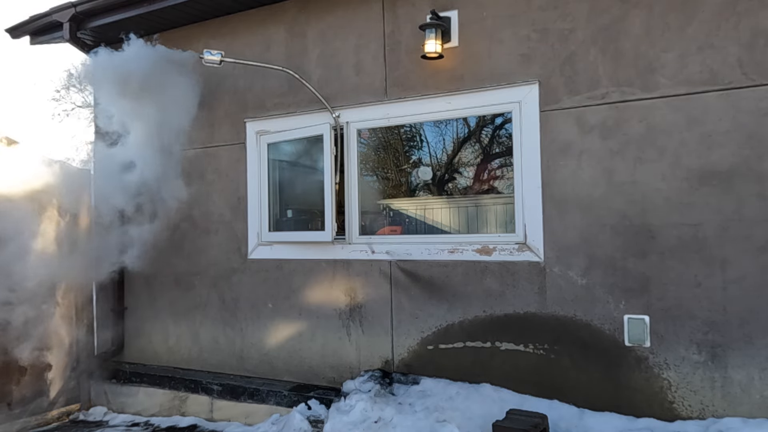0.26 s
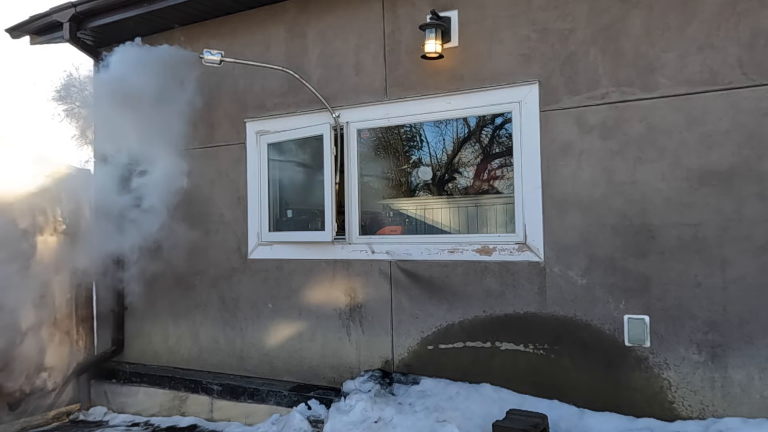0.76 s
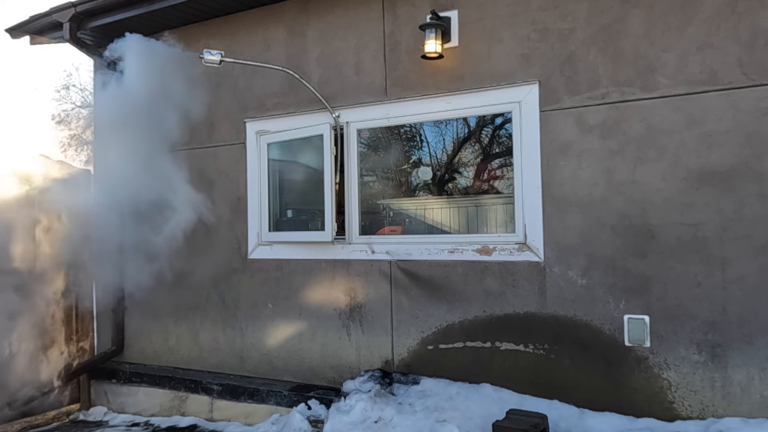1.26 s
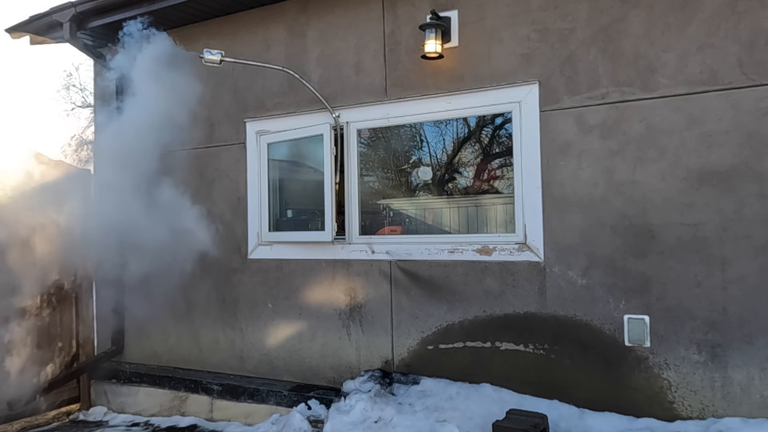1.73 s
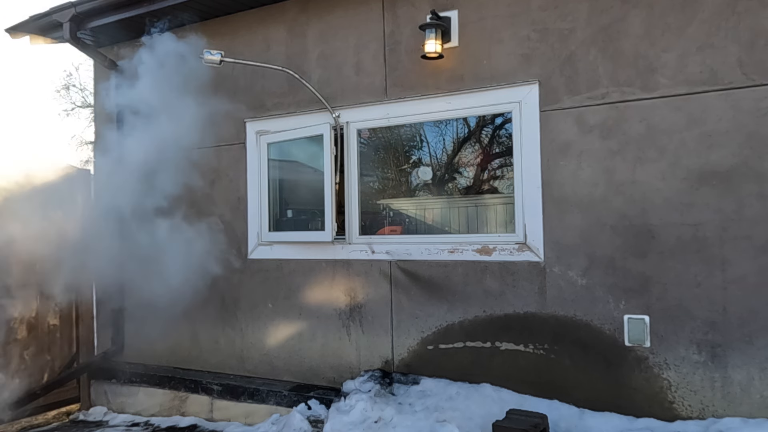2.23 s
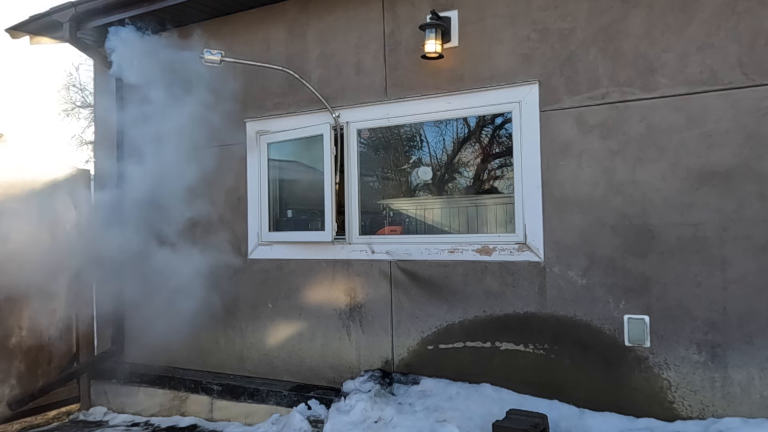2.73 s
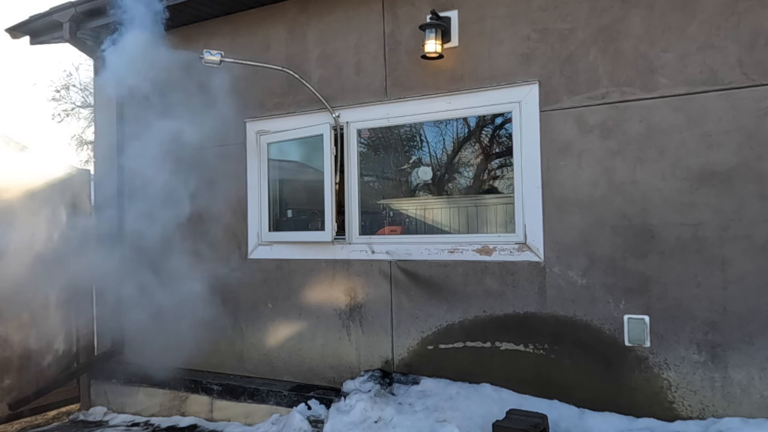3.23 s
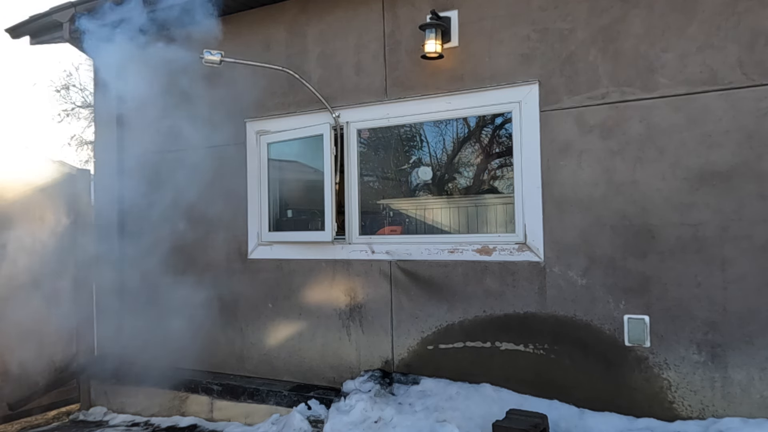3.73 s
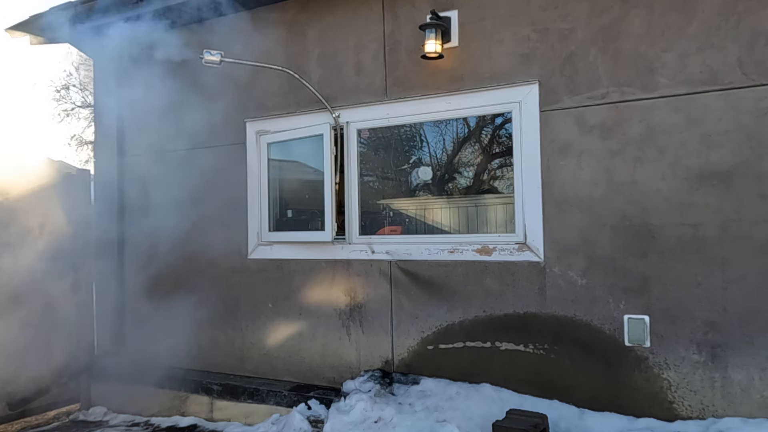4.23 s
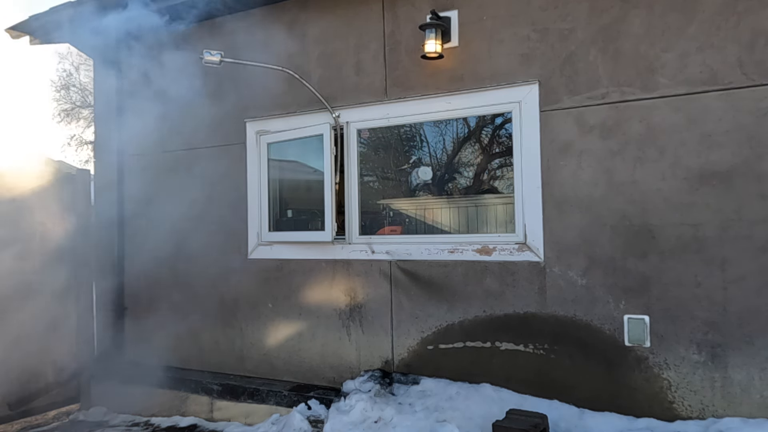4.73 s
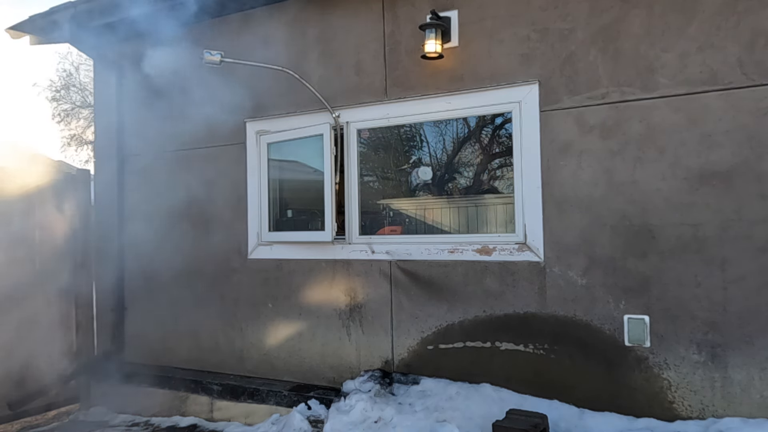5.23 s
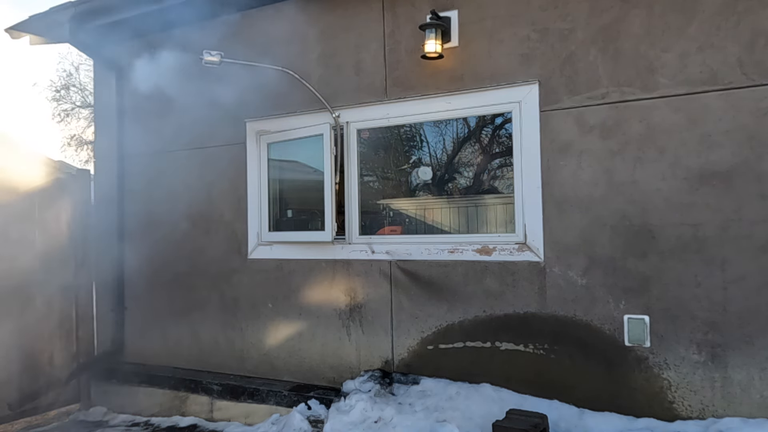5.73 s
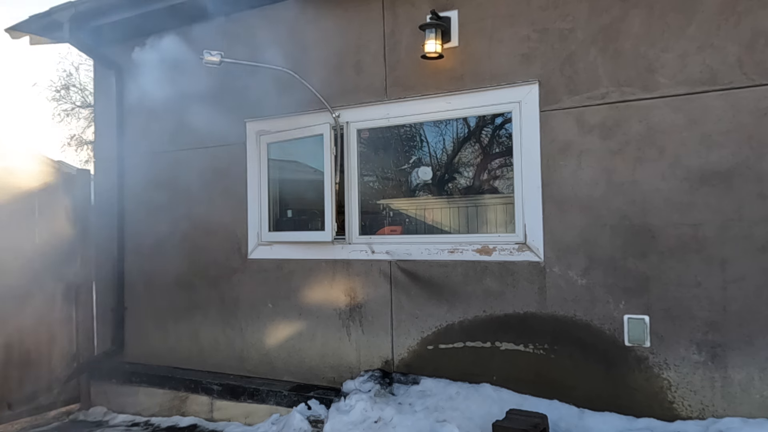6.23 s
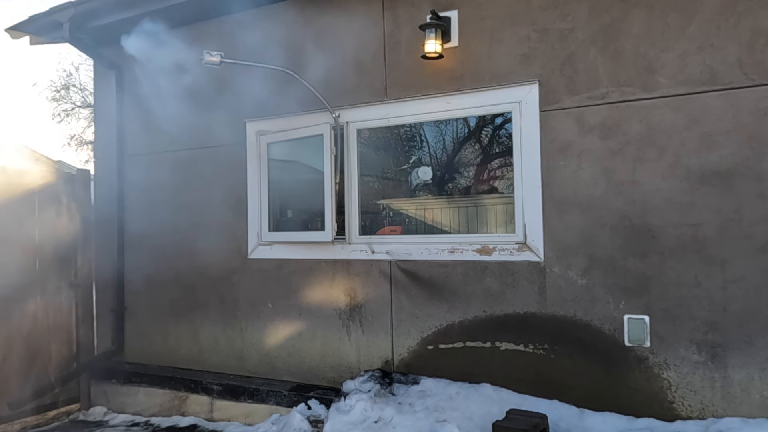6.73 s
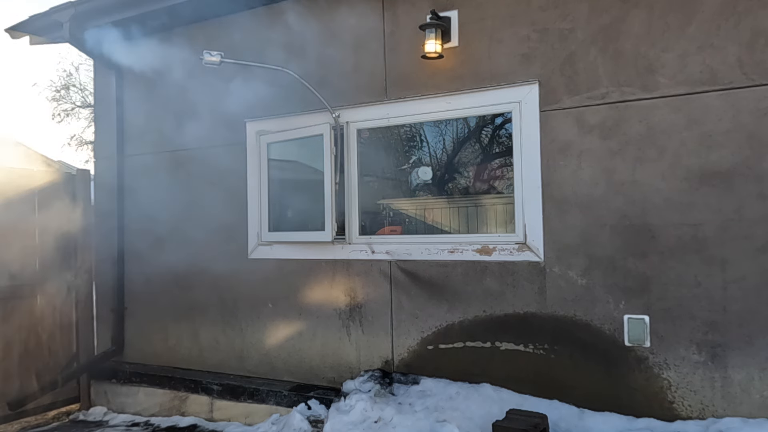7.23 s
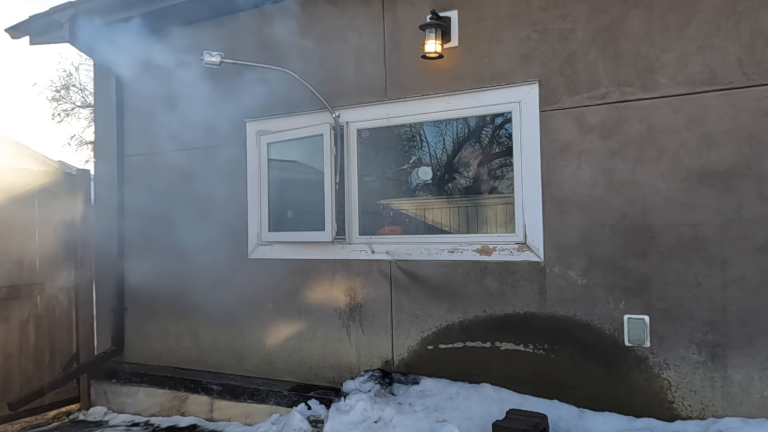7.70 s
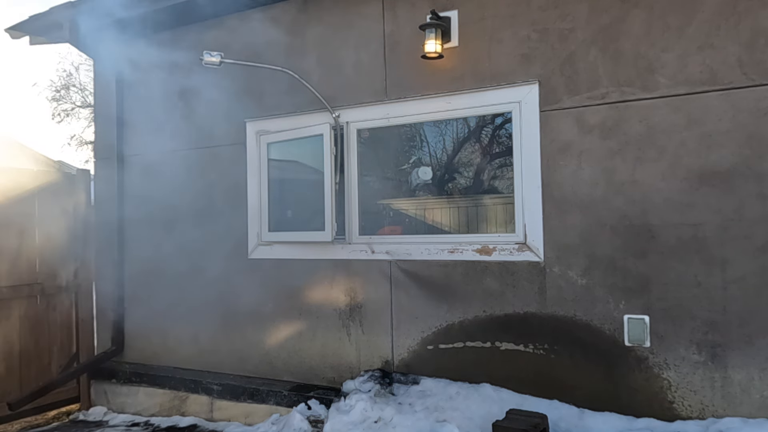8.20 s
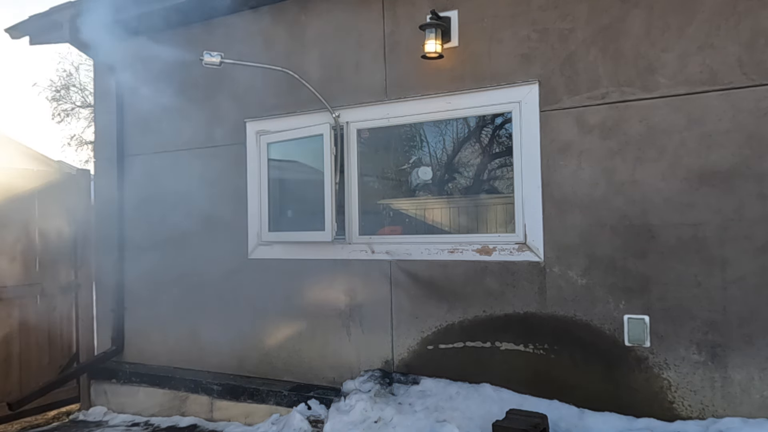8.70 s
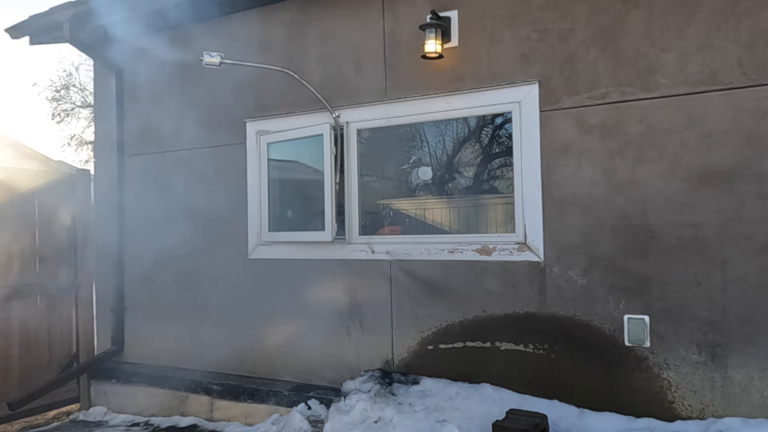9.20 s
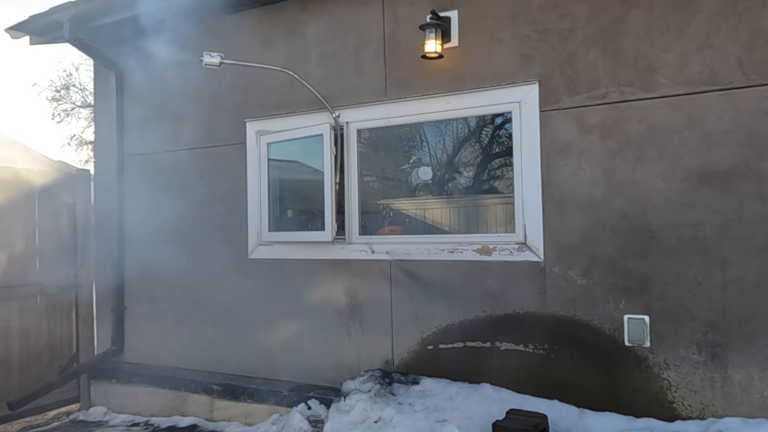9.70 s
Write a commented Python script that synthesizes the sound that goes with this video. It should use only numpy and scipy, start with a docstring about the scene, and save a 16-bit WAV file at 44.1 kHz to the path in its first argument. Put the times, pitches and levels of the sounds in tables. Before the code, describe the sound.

A small diesel heater's low, fluttering roar and drone pulse unevenly from an exhaust pipe, with airy blower hiss, wind bumps, icy ticks and distant chirps.

```python
"""A low, unsteady roar with a drone under it: a small diesel heater burns and vents through a pipe in a
house wall, out in the snow. Noise filled with the resonances of chamber and pipe makes the roar, which
flares with each dose of fuel; a wavering sine drones. The blower is hissing noise, a blade tone and duct
whistles. Gusts of low noise bump the microphone, short noise bursts tick like ice close by, and a distant
bird, gliding sines with a diffuse echo, chirps three times."""
import sys
import numpy as np
from scipy import signal
from scipy.fft import rfft, irfft
from scipy.io import wavfile
from scipy.ndimage import uniform_filter1d

SR = 44100
rng = np.random.default_rng(int(sys.argv[2]) if len(sys.argv) > 2 else 0)


def materialize(psi):
    """Save the field psi as 16-bit PCM at rate SR to the path in sys.argv[1].

    A 1-D psi becomes a single channel; in a 2-D psi each row is a channel.
    """
    bounded = np.clip(np.atleast_2d(psi).T, -1, 1)
    quanta = np.round(bounded * 32767).astype(np.int16)
    wavfile.write(sys.argv[1], SR, quanta)


N = 438794
T = np.arange(N) / SR  # time [s]
HZ = np.maximum(np.arange(N // 2 + 1) * SR / N, 1)  # frequency of each spectral bin [Hz], kept above zero

# small icy ticks: (time [s], level before the common gain [dB], centre [Hz], width [Hz], left minus right [dB])
TICK_EVENTS = [(0.136, -69, 10500, 7000, -1), (0.152, -69, 10500, 7000, 0), (0.185, -67, 9000, 7000, 0),
               (0.24, -70, 11000, 6000, 0), (0.284, -60, 4500, 4500, 0), (0.665, -55.5, 7200, 6500, -5),
               (0.677, -60, 9500, 14000, 3), (0.686, -67, 12000, 3000, 1), (0.713, -68, 8500, 8000, 1),
               (0.7556, -49.5, 5000, 4600, -1), (0.757, -54, 5800, 6500, -1), (1.38, -66, 9500, 7000, 0),
               (1.413, -51, 3380, 1300, 0), (2.694, -58, 4200, 2200, -3), (2.724, -54, 3120, 1500, -3),
               (3.078, -58.5, 5500, 3400, 0), (3.409, -56.5, 5900, 6000, -1),
               (3.4266, -60, 8500, 11000, -1), (3.511, -58, 5500, 2000, -4), (4.15, -60, 5000, 4000, -12),
               (4.195, -54, 4300, 2600, -2), (4.569, -56, 8500, 18000, 2), (4.576, -66, 7500, 7000, 11),
               (4.581, -63, 11000, 7000, 7), (4.622, -64, 8500, 11000, 0), (5.216, -63, 8500, 9000, -1),
               (5.32, -53, 3280, 2000, -3), (5.815, -65, 7500, 7000, 0), (5.86, -58, 6300, 4500, -1),
               (6.243, -61, 8700, 11000, 3), (6.431, -59, 7180, 5000, 0), (6.51, -57, 6800, 4000, 0),
               (6.947, -65, 8450, 9000, 1), (7.158, -54, 6000, 6000, 0), (7.504, -56.5, 7200, 12000, 1),
               (7.553, -65, 9580, 10000, 0), (7.81, -55, 5420, 4800, 0), (8.066, -58, 5830, 5030, -2),
               (8.162, -55, 6000, 5000, -1), (8.179, -65, 8000, 9000, 0), (8.187, -61, 9800, 8000, 1),
               (8.46, -61, 6260, 6000, 1), (8.627, -53.5, 6340, 6550, 0), (8.898, -67, 9000, 8000, 2),
               (9.113, -56.5, 7800, 10000, 0), (9.186, -53, 8600, 12900, 0), (9.189, -55, 8600, 12900, 0),
               (9.202, -67, 9800, 7000, 4), (9.293, -56, 8000, 7500, 2), (9.305, -61, 7270, 7000, 3),
               (9.37, -72, 11000, 5000, 3), (9.737, -68, 7500, 8000, 12), (9.76, -59, 7140, 10100, -2),
               (9.832, -66, 9100, 8400, -3)]


def flame():
    """Forced resonance: combustion noise excites chamber and pipe, and one low mode sustains itself."""
    # slow course of the flame: (time [s], roar [dB], low body of the roar [dB], rumble [dB], drone [dB])
    burning = [(0.0, -43.5, -47, -38.5, -36.5), (0.9, -43.5, -47.5, -39, -37),
               (2.1, -42, -47.5, -38, -37.5), (3.4, -43, -49, -38.5, -38), (3.87, -43, -50, -38, -43.5),
               (4.35, -45.5, -50.5, -39, -36.5), (5.3, -47.5, -53, -43, -43.5), (5.8, -45, -51, -41, -39),
               (6.3, -47.5, -51, -40, -40), (6.9, -48.5, -55.5, -40, -42), (7.35, -49.5, -55, -40.5, -42),
               (7.9, -49.5, -55.5, -41.5, -44.5), (8.9, -50, -55, -39.5, -42), (9.95, -52, -54, -41, -43.5)]
    # exhaust pipe resonances: (frequency [Hz], width [Hz], relative level [dB])
    pipe_modes = [(407.7, 32.5, 1), (469.7, 55, -5), (508.7, 25, -3.5), (559.2, 15, -7.5), (592, 47, -11.5),
                  (667.8, 12.6, -8), (697, 27, -11), (850, 146, -18.5), (958, 55, -12.5), (1051, 75, -12.5),
                  (1202, 23, -18.5), (1250, 45, -14), (1331, 28, -21)]
    # lowest exhaust resonances, the body of the roar: (frequency [Hz], width [Hz], relative level [dB])
    body_modes = [(269.6, 51, 0), (319, 49, -1), (345.5, 32, 2.5)]
    # burner chamber resonances: (frequency [Hz], width [Hz], relative level [dB])
    chamber_modes = [(55.8, 16, -5), (71.5, 10.2, -0.5), (94, 22, -11.5)]
    # chamber overtones, which throb with the doses: (frequency [Hz], width [Hz], relative level [dB])
    throb_modes = [(160, 88, -2), (215, 41.4, 0.5)]
    flare_db, flare_per_sunk_db = 0.9, 0.0928  # per unit of flare; added to it for each dB the roar has sunk
    flicker_db, drone_flare_db = 0.96, 0.26  # random flicker, rms; further swing of the drone per unit of flare
    rumble_follow, throb_follow, throb_db = 0.67, 0.98, -8.5  # shares of the surge; throb relative to rumble
    drone_hz, waver_hz, flutter = 119.6, 2.53, 0.37  # waver and flutter are rms

    roar_db, body_db, rumble_db, drone_db = curves(burning)
    sunk_db = roar_db.max() - roar_db
    flaring = flare()
    # the lower the flame burns, the more each dose of fuel shows
    surge_db = flaring * (flare_db + flare_per_sunk_db * sunk_db) + flicker_db * walk(9.5)

    pipe = wander(outdoors(resonances(pipe_modes)), share=0.005005)
    roar = steadied(pipe, seconds=0.44) * undb(roar_db + surge_db)
    body = steadied(outdoors(resonances(body_modes)), seconds=0.44) * undb(body_db + surge_db)

    chamber = steadied(outdoors(resonances(chamber_modes)), seconds=0.59)
    rumble = chamber * undb(rumble_db + rumble_follow * surge_db)
    overtones = steadied(outdoors(resonances(throb_modes)), seconds=0.29)
    throb = overtones * undb(rumble_db + throb_db + throb_follow * surge_db)

    phase = 2 * np.pi * np.cumsum(drone_hz + waver_hz * walk(12.5)) / SR
    singing = steadied(np.sin(phase) * (1 + flutter * walk(11.8)), seconds=0.49)
    drone = singing * undb(drone_db + surge_db + drone_flare_db * flaring)
    return roar + body + rumble + throb + drone


def flare():
    """Pulsed heat release: each dose lifts the flame quickly, holds and lets it sink to the rest value -1."""
    # doses of fuel: (time [s], strength [1 lifts the flare from -1 to 1])
    fuel_doses = [(0.0, 0.4), (0.72, 0.59), (1.52, 0.53), (2.42, 0.29), (3.12, 0.93), (3.98, 0.6),
                  (4.72, 1.37), (5.5, 0.98), (6.27, 0.85), (7.08, 1.3), (7.9, 0.75), (8.68, 0.93),
                  (9.48, 1.1)]
    rise_s, hold_s, fall_s = 0.11, 0.22, 0.27
    corners_s = np.cumsum([0, rise_s, hold_s, fall_s])
    heat = sum(strength * np.interp(T - s, corners_s, [0, 1, 1, 0]) for s, strength in fuel_doses)
    return 2 * heat - 1


def wander(x, share, rate=3.04):
    """Sound speed rises with temperature: hot and cool puffs of gas pull the resonances up and down."""
    warped = T + np.cumsum(share * walk(rate)) / SR  # share: rms change of pitch
    return np.array([np.interp(warped, T, ear, period=N / SR) for ear in x])


def blower():
    """Flow noise and blade passing: air hisses through the resonant duct, the blades give one thin tone."""
    # blade passing: (time [s], frequency [Hz], level before the common trim [dB])
    blade_tone = [(0, 1543, -61), (0.8, 1555, -60), (3.5, 1559, -59.5), (4.7, 1565, -60), (6.0, 1573, -62),
                  (7.5, 1564, -58), (8.8, 1548, -59.5), (9.95, 1556, -61)]
    # rush of the air: (frequency [Hz], relative level per Hz [dB])
    air_colour = [(150, -12.5), (400, -5), (650, 5.5), (850, -0.5), (1150, 3.5), (1500, -1), (1850, -7.5),
                  (2150, -4.5), (2700, -7.5), (3000, -11), (3400, -11), (4000, -17.5), (5200, -20),
                  (6200, -24.5), (7700, -24.5), (8400, -30.5), (12000, -33), (13100, -43), (14000, -53)]
    # duct resonances in that rush: (frequency [Hz], width [Hz], relative level [dB])
    duct_modes = [(1676, 34, 2), (2073, 18, -4), (2274, 10, 3), (2378, 34, 3.5), (2520, 70, -1),
                  (2855, 41, 1.5), (3335, 140, -7), (3795, 70, -11.5), (4690, 220, -11), (5670, 120, -15),
                  (7210, 390, -13.5)]
    air_db, duct_db, tone_trim_db = -52.0, -65.5, -2.5
    waver_hz, flutter = 2.04, 0.056  # rms

    air = outdoors(colour(air_colour) * walls(0.12)) * undb(air_db + 0.5 * walk(12))
    duct = outdoors(resonances(duct_modes)) * undb(duct_db + 0.42 * walk(13.0))
    hz, tone_db = curves(blade_tone)
    phase = 2 * np.pi * np.cumsum(hz + waver_hz * walk(13.2)) / SR
    tone = unit(np.sin(phase) * (1 + flutter * walk(27))) * undb(tone_db + tone_trim_db)
    return air + duct + tone * pan(db=5.0)


def walls(strength, count=6):
    """Comb filtering: early echoes off wall, eaves and fence ripple the colour of a steady sound."""
    lags_s = rng.uniform(0.003, 0.025, count)
    return np.abs(1 + strength * sum(np.exp(-2j * np.pi * HZ * lag) for lag in lags_s))


def whistles():
    """Edge tones: air over the duct's edges whistles faintly, the lower one swelling, the upper one wavering."""
    # upper whistle: (time [s], frequency [Hz], level [dB])
    upper_course = [(0, 4710, -86), (2.6, 4710, -85), (5.0, 4710, -84), (5.7, 4700, -83), (5.92, 4690, -73),
                    (6.2, 4720, -83), (6.45, 4780, -87), (6.8, 4970, -80), (8.8, 4970, -81),
                    (9.95, 4940, -86)]
    # swells of the lower whistle: (time of the peak [s], rise [s], fall [s], level [dB])
    lower_swells = [(0.23, 0.15, 0.1, -64.5), (0.6, 0.15, 0.12, -66), (2.42, 0.048, 0.048, -61),
                    (3.7, 0.06, 0.06, -64)]
    low_hz, low_width_hz, low_floor_db = 2825, 45, -75
    waver_hz, waver_db = 45, 2.0  # rms
    breath_hz = 110  # spread of the breathy upper whistle to either side of its centre

    low = outdoors(resonances([(low_hz, low_width_hz, 0)])) * swells(lower_swells, floor_db=low_floor_db)
    high_hz, high_db = curves(upper_course)
    phase = 2 * np.pi * np.cumsum(high_hz + waver_hz * walk(4)) / SR
    breathy = walk(breath_hz) * np.sin(phase) + walk(breath_hz) * np.cos(phase)  # a narrow band of noise
    return low + breathy * undb(high_db + waver_db * walk(6))


def wind():
    """Turbulent pressure: gusts bump both microphone ports together, the right one harder."""
    # turbulence: (frequency [Hz], relative level per Hz [dB])
    wind_colour = [(6, -28), (18, 7.5), (40, -1.5), (65, 0.5), (100, -12.5), (200, -26.5), (500, -50),
                   (1500, -101)]
    # gusts: (time of the peak [s], rise [s], fall [s], level [dB])
    gust_swells = [(0.64, 0.022, 0.028, -22), (0.963, 0.16, 0.06, -25), (2.45, 1, 0.5, -39),
                   (4.18, 0.22, 0.12, -29), (8.889, 0.0072, 0.042, -25), (9.103, 0.018, 0.05, -28.5),
                   (9.42, 0.08, 0.15, -30.5)]
    breeze_db, apart_db = -50, -20.0  # light air between gusts; each port's own turbulence, relative

    eddies = colour(wind_colour)
    shared = steadied(noise(eddies), seconds=0.12) * pan(db=-5.0)
    separate = np.array([noise(eddies), noise(eddies)])
    return (shared + undb(apart_db) * separate) * swells(gust_swells, floor_db=breeze_db)


def ticks():
    """Impulsive fracture: each tick is a brief crack of coloured noise with a faint, crumbling tail."""
    # ring that all ticks share: (frequency [Hz], relative level [dB])
    shared_ring = [(1500, -12), (2800, 6), (4600, -1.5), (5250, 2.5), (6100, -2), (7100, 2), (8500, -6.5),
                   (10500, -3.5), (12300, -1.5), (13200, -6), (14200, -14)]
    rise_s, decay_s, tail_s = 0.0012, 0.0013, 0.037
    tail_db, crumble_db, gain_db = -27, 4, 12.5  # tail relative to crack; its random variation; common gain
    apart = 0.33  # share of the sound that differs between the ears

    out = np.zeros((2, N))
    age = T[:SR // 10]
    hz = np.maximum(np.fft.rfftfreq(len(age), 1 / SR), 1)
    ring = np.interp(hz, HZ, colour(shared_ring))
    for s, db, centre_hz, width_hz, pan_db in TICK_EVENTS:
        shape = ring / (1 + ((hz ** 2 - centre_hz ** 2) / (hz * width_hz)) ** 2)  # one broad resonance
        white = rng.standard_normal((2, len(age)))
        mid, side = unit(irfft(shape * rfft(white), len(age)))
        ears = np.array([mid + apart * side, mid - apart * side])

        knots = np.linspace(0, age[-1], num=30)
        crumbling_db = crumble_db * np.interp(age, knots, rng.standard_normal(size=30))
        tail = undb(tail_db + crumbling_db) * np.exp(-age / tail_s)
        strength = (1 - np.exp(-age / rise_s)) * (np.exp(-age / decay_s) + tail)

        start = int(s * SR)
        out[:, start:start + len(age)] += ears * strength * undb(db + gain_db) * pan(pan_db)
    return out


def crumbs(count=40, size_db=-70, decay_s=0.003, scatter_s=0.12):
    """Clustered random impulses: tinier ticks scatter around the larger ones, stronger on the left."""
    strength = np.zeros(N)
    age = T[:SR // 30]
    for pick, lag, size in rng.random((count, 3)):
        parent_s = TICK_EVENTS[int(pick * len(TICK_EVENTS))][0]
        s = parent_s + scatter_s * np.log(lag / (1 - lag))  # logistic scatter, before or after
        start = int(s * SR) % (N - len(age))
        strength[start:start + len(age)] += undb(size_db) * (0.5 + size) * np.exp(-age / decay_s)
    grit = outdoors(colour([(2000, -10), (5000, 4), (12000, -4), (14000, -24)]))
    return strength * grit * pan(db=3)


def bird():
    """Frequency glides and reverberation: whistles drop and level off, and the yards between echo them."""
    # notes, three to a call: (time [s], length [s], end pitch [Hz], fall [share of end pitch], peak level [dB])
    bird_notes = [(1.316, 0.03, 3330, 0.1, -57), (1.381, 0.073, 3130, 0.14, -55),
                  (1.51, 0.04, 2580, 0.061, -57.5), (4.743, 0.02, 3260, 0.07, -59),
                  (4.78, 0.088, 3060, 0.27, -57.5), (4.882, 0.026, 2600, 0.05, -54),
                  (7.244, 0.026, 3240, 0.1, -60), (7.352, 0.04, 2920, 0.17, -58),
                  (7.405, 0.045, 2760, 0.025, -61)]
    bend, warble, rough = 1.72, 0.0043, 0.26  # curve of the fall; rms shares of pitch and of amplitude
    echo_db, echo_lag_s, echo_decay_s = -1.5, 0.016, 0.06  # echo relative to the direct song

    song, quiver, rasp = np.zeros(N), walk(121), walk(150)
    for s, length, end_hz, fall, db in bird_notes:
        u = np.linspace(0, 1, int(length * SR))
        note = slice(int(s * SR), int(s * SR) + len(u))
        hz = end_hz * (1 + fall * (1 - u) ** bend) * (1 + warble * quiver[note])
        strength = undb(db) * np.sqrt(np.abs(np.sin(np.pi * u))) * (1 + rough * rasp[note])
        song[note] += strength * np.sin(2 * np.pi * np.cumsum(hz) / SR)

    age = T[:SR // 2] - echo_lag_s
    decay = (age > 0) * np.exp(-age / echo_decay_s) / np.sqrt(echo_decay_s * SR / 2)  # energy about 1
    yards = rng.standard_normal((2, len(age))) * decay
    echo = signal.fftconvolve(song[None], yards, axes=1)[:, :N]
    return song + undb(echo_db) * echo


def undb(db):
    """Logarithmic level: decibels to amplitude gain."""
    return 10 ** (np.asarray(db) / 20)


def unit(x):
    """Effective value: scale to rms 1."""
    return x / np.sqrt(np.mean(x ** 2))


def curves(table):
    """Linear interpolation: each column of a time table, sample by sample."""
    s, *columns = np.transpose(table)
    return [np.interp(T, s, c) for c in columns]


def colour(points):
    """Spectral envelope: gain per frequency from (frequency [Hz], level [dB]) points, over log frequency."""
    hz, db = np.transpose(points)
    return undb(np.interp(np.log(HZ), np.log(hz), db))


def resonances(modes):
    """Modal superposition: gain per frequency of steep-sided resonances that add in power."""
    power = 0
    for hz, width, db in modes:
        detuning = (HZ ** 2 - hz ** 2) / (HZ * width)
        power = power + (undb(db) / (1 + detuning ** 2)) ** 2
    return np.sqrt(power)


def noise(gain):
    """Filtered Gaussian noise: turbulence with the given colour, rms 1."""
    spectrum = rng.standard_normal(len(HZ)) + 1j * rng.standard_normal(len(HZ))
    return unit(irfft(gain * spectrum, N))


def walk(rate):
    """Low-pass noise: smooth chance that changes about rate times a second, rms 1."""
    return noise(np.exp(-(HZ / rate) ** 2))


def outdoors(gain):
    """Partial coherence: turbulence heard directly and, scattered by wall and fence, differently in each ear."""
    # sound that differs between the ears: (frequency [Hz], side minus mid [dB])
    side_colour = [(60, -50), (120, -19), (350, -16.5), (700, -12.5), (1400, -9.5), (3000, -9),
                   (6000, -9.5), (10000, -9.5), (13000, -1)]
    scattered = gain * colour(side_colour)
    side = noise(scattered) * np.sqrt(np.sum(scattered ** 2) / np.sum(gain ** 2))
    return noise(gain) + np.array([[1], [-1]]) * side


def pan(db):
    """Interaural level difference: left and right gains for left minus right in dB."""
    return undb(np.array([[db], [-db]]) / 2)


def steadied(x, seconds):
    """Running rms normalisation: turbulence without its slow swells, so that a control sets its strength."""
    power = np.mean(np.atleast_2d(x) ** 2, axis=0)
    return x / np.sqrt(uniform_filter1d(power, int(seconds * SR)))


def swells(table, floor_db):
    """Power addition: exponential swells grow and die away on top of a steady flow."""
    power = undb(floor_db) ** 2
    for s, rise_s, fall_s, db in table:
        distance = np.maximum((s - T) / rise_s, (T - s) / fall_s)
        power = power + (undb(db) * np.exp(-distance)) ** 2
    return np.sqrt(power)


def scene():
    """Linear superposition: the heater with the small sounds of the yard around it."""
    return flame() + blower() + whistles() + wind() + ticks() + crumbs() + bird()


def record(dry):
    """Linear filtering: the left port is a little brighter than the right; the recorder cuts the top."""
    lean = colour([(7000, 0), (10000, 0.85), (13000, 2.0)])
    ports = irfft(rfft(dry) * np.array([lean, 1 / lean]), N)
    top_hz = 14100
    return signal.sosfilt(signal.ellip(8, 0.2, 70, top_hz, fs=SR, output="sos"), ports)


dry = scene()
out = record(dry)
materialize(out)
```